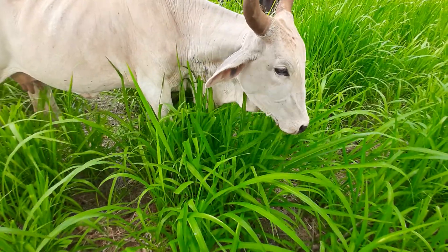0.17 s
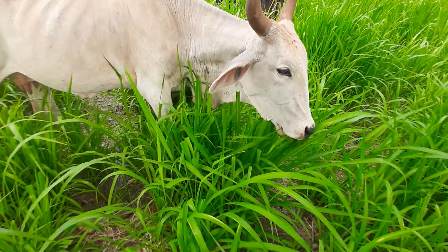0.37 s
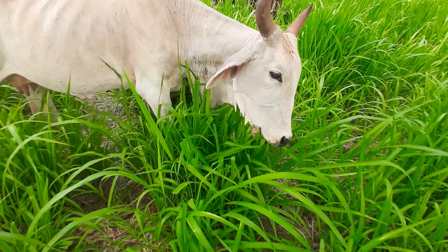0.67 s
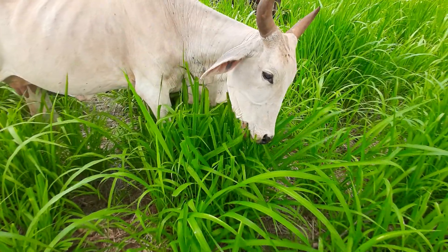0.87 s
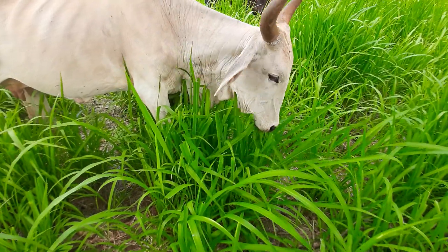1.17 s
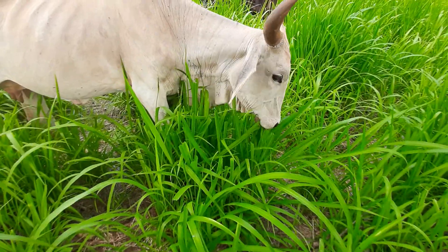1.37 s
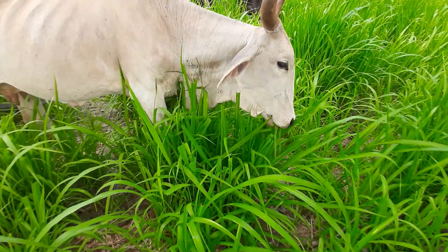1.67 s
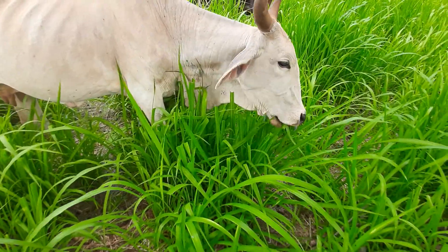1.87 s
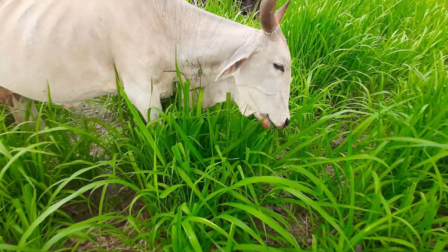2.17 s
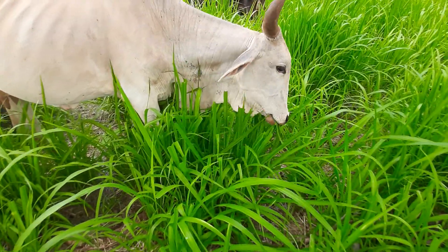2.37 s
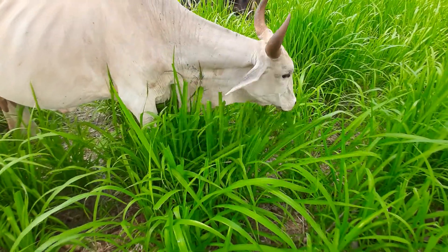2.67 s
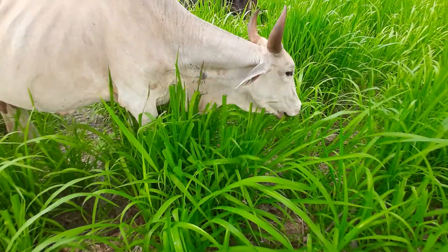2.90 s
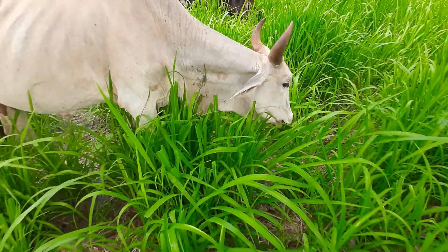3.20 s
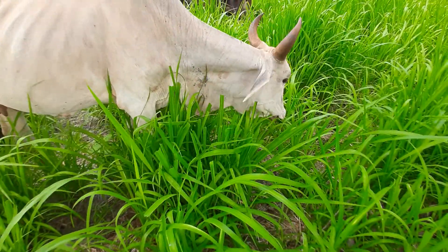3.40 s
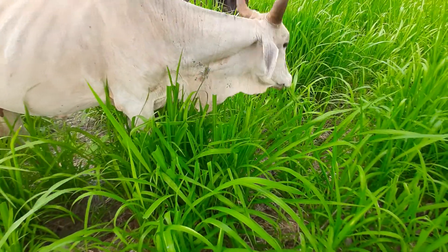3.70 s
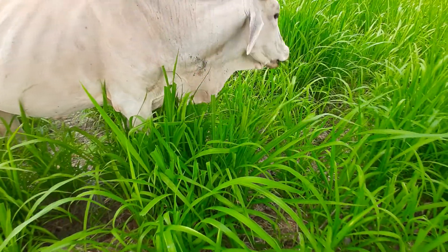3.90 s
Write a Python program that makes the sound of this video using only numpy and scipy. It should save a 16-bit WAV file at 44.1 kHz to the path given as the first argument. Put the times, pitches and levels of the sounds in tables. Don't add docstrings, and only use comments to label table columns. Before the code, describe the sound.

A cow grazes on tall grass very near a small mono microphone outdoors, dry and without echo. From the start, blades slide together in a grainy, bright rustle while low, soft wind puffs thump the microphone, strongest until about 0.8 s. Small snaps come at 0.56 and 0.7 s. Blades scrape around 1.0 s, then a sharp bright crack at 1.18 s leads a rapid cluster of snaps to 1.25 s. It drops to a quiet lull near 1.45 s, followed by gentle leafy sweeps, a few ticks and weaker wind bumps around 2.0-2.2 s. The pull swells at 2.4 s into the hardest tear, a dense crunchy burst of breaking stalks peaking at 2.5 s, with fuller stem body. Leaves hiss free until about 2.9 s, with crisp ticks. From 3 to 4 s only faint draws, short scrapes and tiny fibre clicks remain over low field hush and hiss.

```python
import sys
import numpy as np
from scipy import signal
from scipy.fft import rfft, irfft
from scipy.io import wavfile
from scipy.ndimage import uniform_filter1d

SR = 44100
rng = np.random.default_rng(int(sys.argv[2]) if len(sys.argv) > 2 else 0)


def ratio_of_db(decibels):
    return 10 ** (np.asarray(decibels, float) / 20)


def master_out(mix):
    frames = np.transpose(np.atleast_2d(mix))
    ceiling = np.clip(frames, -1, 1)
    pcm = np.round(ceiling * 32767).astype(np.int16)
    wavfile.write(sys.argv[1], SR, pcm)


N = 178605


def rms(x):
    return np.sqrt(np.mean(x ** 2) + 1e-20)


def read(points, hz):
    f_hz, value = np.transpose(points)
    return np.interp(np.log(hz + 1), np.log(f_hz + 1), value)


def shaped(points):
    hz = np.fft.rfftfreq(N, 1 / SR)
    x = irfft(rfft(rng.standard_normal(N)) * ratio_of_db(read(points, hz)), N)
    return x / rms(x)


def slow(per_s):
    lowpass = signal.butter(2, per_s, fs=SR, output="sos")
    x = signal.sosfilt(lowpass, rng.standard_normal(N))
    return x / rms(x)


def bump(t_s, centre_s, length_s):
    return np.exp(-(2 * (t_s - centre_s) / length_s) ** 2)


def peaks(rows, rest_db):
    t_s = np.arange(0, N, 32) / SR
    peak_s, db, rise_s, fall_s = np.transpose(rows)[:, :, None]
    before = (peak_s - t_s) / np.maximum(rise_s, .003)
    after = (t_s - peak_s) / np.maximum(fall_s, .003)
    slopes = np.where(t_s < peak_s, before, after)
    power = (ratio_of_db(db - 10 * slopes) ** 2).sum(0) + ratio_of_db(rest_db) ** 2
    return np.interp(np.arange(N) / SR, t_s, 10 * np.log10(power))


def ringing(hz, width_hz, size=1800):
    t_s = np.arange(size) / SR
    x = np.exp(-np.pi * width_hz * t_s) * np.sin(2 * np.pi * hz * t_s)
    return x / np.linalg.norm(x)


def causal(db):
    log_gain = np.log(ratio_of_db(np.maximum(db, -100)))
    circle = np.concatenate([log_gain, log_gain[-2:0:-1]])
    taps = np.fft.ifft(np.exp(np.conj(signal.hilbert(circle)))).real[:2048]
    return taps / np.linalg.norm(taps)


# [f/Hz, level/dB per Hz]
BASS_DB = [(88, -47), (150, -16.0), (481, -16), (749, -9.5), (922, -6.0), (1300, -7.5), (1690, -5.5),
           (2860, -120)][:-1]
# [f/Hz, level/dB per Hz]
PORT_DB = [(760, -44), (1300, -14), (1390, -11), (1520, 2.5), (1810, -2.0), (2130, 3.5), (2510, 2.5),
           (2930, -4.5), (3110, -8.5), (3680, -28.0), (4800, -18.5), (6090, -12.0), (8150, -8.5),
           (10000, -10.0), (13000, -21), (22000, -120)][1:-1] + [(11600, -9.5), (13000, -17.5),
           (15800, -26)]
# [low f/Hz, high f/Hz]
PARTS_HZ = [
    (4100, 17000),
    (1450, 4100),
    (550, 1450),
    (170, 550),
]


def colours():
    hz = np.fft.rfftfreq(4096, 1 / SR) + 1
    port_db = read([*BASS_DB, *PORT_DB], hz)
    taps = []
    for low_hz, high_hz in PARTS_HZ:
        share = 1 / (1 + (low_hz / hz) ** 12) / (1 + (hz / high_hz) ** 12)
        taps.append(causal(port_db + 10 * np.log10(share + 1e-12)))
    return taps


# [t/s, depth/dB, length/s]
LULLS = [
    (0.91, 3, .08),
    (1.445, 7, 0.044),
    (2.285, 0.5, .08),
    (3.384, 3, 0.084),
    (3.94, 5, 0.064),
]
# [f/Hz, level/dB per Hz]
HUSH_SPECTRUM_DB = [(18, -67), (30, -47), (75, -3), (679, -17), (1410, -8), (2210, -9.5), (3730, -33),
                    (6300, -4.5), (8410, 1), (9590, -10.5), (15800, -25)]


def hush():
    t_s = np.arange(N) / SR
    dip_db = sum(db * bump(t_s, s, length_s) for s, db, length_s in LULLS)
    return ratio_of_db(-65.5 - dip_db) * shaped(HUSH_SPECTRUM_DB)


# [f/Hz, level/dB per Hz]
GUST_DB = [(12, -68), (20, 11), (43, 1.5), (66, 5.5), (168, -13), (216, -40), (315, -17), (400, -25.5),
           (520, -44), (880, -120)]
# [t/s, level/dB, rise/s per 10 dB, fall/s per 10 dB]
PUFFS = [(0.0, -61, .03, .025), (0.07, -57, .035, .04), (0.165, -52, .02, .05), (0.21, -58, .03, .03),
         (0.28, -60, .03, .05), (0.385, -55, .05, .04), (0.485, -50, .04, .04), (0.58, -63, .04, .04),
         (0.7, -65, .03, .05), (0.775, -54, .04, .03), (0.88, -71, .02, .04), (1.065, -73, .015, .015),
         (1.15, -74, .015, .02), (1.24, -72, .04, .02), (1.31, -68, .02, .02), (1.415, -69, .03, .04),
         (1.5, -72, .02, .04), (2.045, -62, .025, .05), (2.23, -64, .03, .02), (2.52, -74, .1, .12),
         (2.88, -75, .1, .1), (3.1, -81, .1, .15), (3.35, -80, .06, .1), (3.75, -82, .1, .1),
         (4.02, -79, .1, .1)]


def wind():
    calm_db, eddy_s = -88.5, .04
    eddies = shaped(GUST_DB)
    eddies = eddies / np.sqrt(uniform_filter1d(eddies ** 2, size=round(eddy_s * SR)) + .1)
    return ratio_of_db(peaks(PUFFS, calm_db) - 2.0 + 0.24 * slow(per_s=15)) * eddies


REST_DB = [
    -80,
    -82,
    -84,
    -88,
]
# [t/s, level/dB, rise/s per 10 dB, fall/s per 10 dB, stalks re level/dB]
GATHER = [(0.03, -55.5, 0.3, 0.1, -8.5), (0.22, -54.5, 0.5, 0.1, -11), (0.421, -55.5, 0.12, -0.03, -9),
          (0.517, -50, .006, .25, -8), (0.681, -50, 0.17, 0.0347, -2.5), (0.8, -53.5, .06, .05, -8),
          (0.85, -60, .06, .07, -7), (1.0, -58, .1, 0.33, -13), (1.11, -53.5, 0.06, 0.05, 1.5),
          (1.188, -46, .004, .08, -10), (1.239, -46, 0.0553, 0.0272, 0), (1.279, -55, 0, 0.14, -5)]
# [t/s, level/dB, rise/s per 10 dB, fall/s per 10 dB, stalks re level/dB]
TEAR = [
    (1.53, -63.5, 0.057, 0.27, -20),
    (1.74, -57, 0.22, 0.27, -7),
    (1.93, -60.5, 0.14, 0.27, -14),
    (2.15, -57, 0.12, 0.11, -5),
    (2.33, -62, .06, 0.11, -5.5),
    (2.43, -51, .08, 0.04, -4.5),
    (2.464, -41, 0.021, 0.064, -4.5),
    (2.51, -42, 0.026, 0.13, -2),
    (2.7, -48.5, 0.19, 0.19, -5.5),
    (2.88, -56.5, 0.28, 0.16, -17),
]
# [t/s, level/dB, rise/s per 10 dB, fall/s per 10 dB, stalks re level/dB]
CHEW = [
    (3.08, -63, .2, .2, -3),
    (3.24, -64, .1, .1, -3),
    (3.48, -61, .09, .07, 0),
    (3.6, -68, .1, .1, -6),
    (3.7, -60, .1, .09, -6),
    (3.88, -64, .1, .035, -10),
    (3.985, -69, .015, .3, -5),
]
# [t/s, stems level/dB, change/s per 10 dB, swish re stems/dB]
SWAYS = [(0.05, -76, 0.3, -11), (0.18, -67.5, -0.13, -7), (0.29, -74, 0.4, -17), (0.43, -72.5, .06, -6.5),
         (0.57, -68, 0.04, -5), (0.655, -72, 0.03, 2), (0.86, -81, 0.4, -2.5), (1.02, -69, 0.08, -7.5),
         (1.22, -72, 0.07, 3.5), (1.37, -75, 0, 1.5), (1.62, -78.5, 0.6, -13), (1.76, -78.5, 0.2, -6),
         (1.91, -77, 0.1, 0.5), (2.16, -71, 0.18, -5.5), (2.515, -53, 0.06, -9), (2.9, -75, 0.2, -5),
         (3.21, -81.5, -0.01, 8.5), (3.41, -81, .02, -1), (3.48, -74.5, -0.09, 2.5),
         (3.729, -69, -0.25, -26), (3.82, -78, -0.07, -2.5), (3.98, -79, .07, 2.5)]


def movement():
    peak_s, db, rise_s, fall_s, stalk_db = np.transpose([*GATHER, *TEAR, *CHEW])
    blades_db = peaks(np.transpose([peak_s, db, rise_s, fall_s]), REST_DB[0])
    stalks_db = peaks(np.transpose([peak_s, db + stalk_db, rise_s, fall_s]), REST_DB[1])
    sway_s, db, change_s, swish_db = np.transpose(SWAYS)
    change_s = np.maximum(change_s, .03)

    def heavy(level_db, follow, own_db, rest_db):
        swayed_db = peaks(np.transpose([sway_s, own_db, change_s, change_s]), rest_db)
        rubbed_db = level_db + follow * (stalks_db + 62)
        both_db = 10 * np.log10(ratio_of_db(rubbed_db) ** 2 + ratio_of_db(swayed_db) ** 2)
        return both_db + 2 * slow(per_s=8.8)

    stems_db = heavy(-77.5, 0.98, db, REST_DB[2])
    swishes_db = heavy(-87.5, 0.63, db + swish_db, REST_DB[3])
    return blades_db, stalks_db, stems_db, swishes_db


def slips(per_s, spread_db, clump_db, clumps):
    hit = rng.random(N) < per_s / SR
    size = np.minimum(rng.exponential(1, N), 4)
    x = hit * rng.standard_normal(N) * ratio_of_db(spread_db * size + clump_db * clumps)
    return x / rms(x)


def cracks():
    clicks = slips(per_s=500, spread_db=2.2, clump_db=2.5, clumps=slow(per_s=30))
    fray = rng.standard_normal(120) * np.exp(-np.arange(120) / 30)
    burst = np.sign(fray) * fray ** 2
    return signal.oaconvolve(clicks, burst / np.linalg.norm(burst))[:N]


# [f/Hz, width/Hz]
STALK_RINGS_HZ = [
    (2300, 450),
    (3050, 600),
]
# [t/s, thickness/0 thin..1 thick]
GRIP = [(0.0, 0.51), (0.5, 0.66), (0.515, .3), (0.76, .3), (0.87, .4), (0.92, 1), (1.4, 0.97), (2.1, 0.53),
        (2.35, 0.63), (2.5, 0.55), (2.8, 0.5), (3.0, 0.81), (3.3, 0.69), (3.5, 0.47), (4.05, 0.7)]


def stalk_ring(stalks):
    thickness = np.interp(np.arange(N) / SR, *np.transpose(GRIP))
    thick, thin = [signal.oaconvolve(stalks, ringing(*ring))[:N] for ring in STALK_RINGS_HZ]
    rung = np.where(thickness > .5, thick / rms(thick), thin / rms(thin))
    share = np.clip(abs(2 * thickness - 1), 0, 1)
    return np.sqrt(1 - share) * stalks + np.sqrt(share) * rung


# [t/s, level/dB, stalk re level/dB, length/s]
SCRAPES = [(0.995, -54.5, -26, 0.051), (1.035, -50.5, -20, 0.034), (1.137, -53, 2.5, 0.014),
           (1.473, -72, -22, 0.0094), (1.763, -53.5, -11.5, 0.038), (2.085, -50, -33, 0.057),
           (3.146, -56, -20, 0.022), (3.186, -61.5, 0, 0.02), (3.296, -55.5, -10, 0.045),
           (3.519, -55.5, -9, 0.033), (3.72, -59, -19, 0.084), (3.402, -76, 8, 0.048)]


def rustle(parts):
    blades_db, stalks_db, stems_db, swish_db = movement()
    gains = [ratio_of_db(blades_db + 2.0), ratio_of_db(stalks_db + 0.24), ratio_of_db(stems_db - 0.37), ratio_of_db(swish_db - 0.3)]
    t_s = np.arange(N) / SR
    for s, db, stalk_db, length_s in SCRAPES:
        swell = bump(t_s, s, length_s)
        gains[0] = np.hypot(gains[0], ratio_of_db(db) * swell)
        gains[1] = np.hypot(gains[1], ratio_of_db(db + stalk_db) * swell)

    common = slips(per_s=9800, spread_db=1.0, clump_db=1.3, clumps=slow(per_s=26))
    drives = []
    for share in [0.74, 0.48, 0.18, 0.24]:
        own = slips(per_s=12000, spread_db=1.0, clump_db=3.0, clumps=slow(per_s=28.7))
        drives.append(np.sqrt(share) * common + np.sqrt(1 - share) * own)

    pull = np.clip((blades_db + 58.5) / 22, .1, .6)
    cracking = pull * cracks()
    drives[:2] = [np.sqrt(1 - pull ** 2) * drive + cracking for drive in drives[:2]]

    sounds = [signal.oaconvolve(drive, taps)[:N] for drive, taps in zip(drives, parts)]
    sounds[1] = stalk_ring(sounds[1])
    return sum(gain * sound for gain, sound in zip(gains, sounds))


# [t/s, peak level/dB, stalk re peak/dB, stem re peak/dB]
BREAKS = [(0.5592, -39, -12, -13.5), (0.678, -40, -3, -33), (0.699, -34, -10, -22),
          (1.0364, -42.5, -6, -12), (1.1344, -58, -1, -36), (1.1835, -21, -20, -36),
          (1.2037, -32.5, -10, -16), (1.2094, -33.5, -6, -19), (1.2169, -31.5, -9, -24),
          (1.2345, -35, -4, -25), (1.2404, -38, 2.5, -28), (2.1546, -41.5, -27, -17.5),
          (2.3994, -35.5, -10.5, -34), (2.4544, -34.5, 1.5, -9), (2.4594, -25, -0.5, -3),
          (2.4655, -36, -9, -30), (2.4755, -38, -18, -11), (2.478, -36.5, -6, -14), (2.487, -46, -4, -14),
          (2.4919, -29, -9, -17), (2.5035, -17.5, -6, -7), (2.5118, -36, 3, 4), (2.5424, -41, -5, -25),
          (2.5537, -33, -6, -14.5), (2.576, -34, 0.5, -11), (3.0112, -49, -3, -9.5),
          (3.1985, -45, -2.5, -14), (3.459, -49, -2, -16), (3.4881, -48, 1.5, -11),
          (3.961, -38.5, -15.5, -11)]
# [t/s, peak level/dB, fibre f/Hz]
TICKS = [(0.511, -37, 8550), (0.795, -37.5, 8040), (1.0862, -36, 5890), (1.1985, -31, 7700),
         (1.4686, -36.5, 8460), (1.5396, -42.5, 8340), (1.5702, -42.5, 6900), (1.7627, -47, 8650),
         (1.9714, -47, 7660), (2.0925, -38, 7850), (2.5335, -27, 8200), (2.601, -28.5, 8300),
         (2.7723, -31, 9000), (2.9048, -38.5, 8500), (3.5995, -42.5, 9300), (3.619, -45, 8350),
         (3.6294, -42, 9700), (3.6919, -43, 8900), (3.763, -45, 8500)]


def breaks():
    spread = np.clip(rng.standard_normal(len(BREAKS)), -2, 2)
    fibre_hz = 7800 * (1 + .12 * spread)
    snapped = [(*row, .015, hz) for row, hz in zip(BREAKS, fibre_hz)]
    ticked = [(s, db, -22, -30, .008, hz) for s, db, hz in TICKS]
    return snapped + ticked


# [f/Hz, width/Hz, level/dB]
HOLLOW = [
    (814, 130, -12),
    (1300, 91, -19),
]


def snaps(parts):
    size = 1800
    t_s = np.arange(size) / SR
    modes = sum(ratio_of_db(db) * ringing(hz, width_hz) for hz, width_hz, db in HOLLOW)
    ring = signal.fftconvolve(modes, parts[2])[:size]
    stem = parts[2][:size] + 0.15 * ring / np.linalg.norm(ring)
    first_fibre_db = 11 * np.exp(-t_s / .001)
    onset = np.minimum(t_s / 0.00024, 1)
    out = np.zeros(N + 2 * size)
    for s, peak_db, stalk_db, stem_db, t60_s, hz in breaks():
        uneven_db = 6 * rng.standard_normal(size)
        level_db = uneven_db + first_fibre_db - 60 * t_s / t60_s
        fibres = rng.standard_normal(size) * ratio_of_db(level_db) * onset
        pitched = signal.fftconvolve(parts[0], ringing(hz, width_hz=730))[:size]
        edge = parts[0][:size] + pitched / np.linalg.norm(pitched)
        levels_db = [-1.5, stalk_db - 0.5, stem_db - 1.0]
        for taps, db in zip([edge, parts[1], stem], levels_db):
            part = signal.fftconvolve(fibres, taps[:size])
            out[round(s * SR):][:len(part)] += ratio_of_db(peak_db + db) * part / abs(part).max()
    return out[:N]


def scene():
    parts = colours()
    mono = hush() + wind() + rustle(parts) + snaps(parts)
    return np.array([mono, mono])


# [low f/Hz, high f/Hz]
GATE_BANDS_HZ = [
    (3400, 4700),
    (10050, 11700),
    (11700, 17000),
]
# [opening level/dB, depth/dB]
GATE_DB = [
    (-71.5, 5.5),
    (-66, 10),
    (-61, 17),
]


def gate(x):
    hz, _, z = signal.stft(x, SR, nperseg=512, noverlap=384)
    for (low_hz, high_hz), (open_db, depth_db) in zip(GATE_BANDS_HZ, GATE_DB):
        band = (hz > low_hz) & (hz < high_hz)
        power = (abs(z[0, band]) ** 2).sum(0)
        level_db = 10 * np.log10(uniform_filter1d(power, size=9) + 1e-14)
        z[:, band] *= ratio_of_db(-depth_db / (1 + ratio_of_db(2.0 * (level_db - open_db))))
    return signal.istft(z, SR, nperseg=512, noverlap=384)[1][:, :N]


def roll_off(x):
    return signal.sosfilt(signal.butter(12, 15930, fs=SR, output="sos"), x)


def record(dry):
    bass_cut = signal.butter(4, 38, "high", fs=SR, output="sos")
    quiet = gate(signal.sosfilt(bass_cut, dry))
    hissy = quiet + ratio_of_db(-78) * rng.standard_normal(N)
    band_limit = signal.firwin(255, 15850, window=("kaiser", 9), fs=SR)
    return roll_off(signal.oaconvolve(hissy, band_limit[None], "same"))


dry = scene()
out = record(dry)
master_out(out)
```